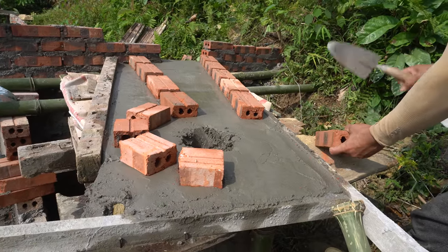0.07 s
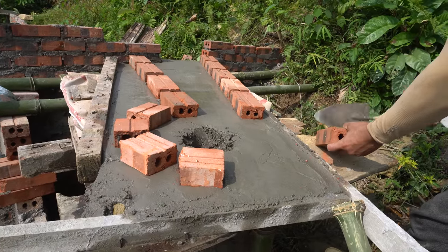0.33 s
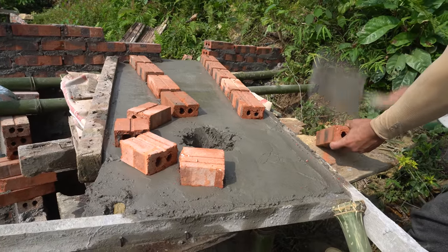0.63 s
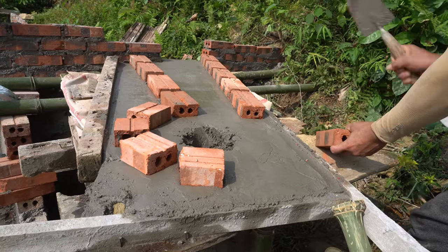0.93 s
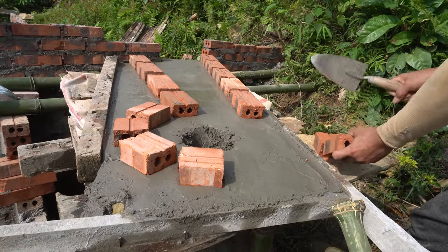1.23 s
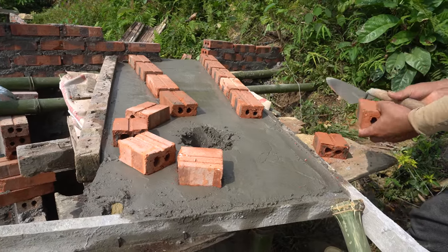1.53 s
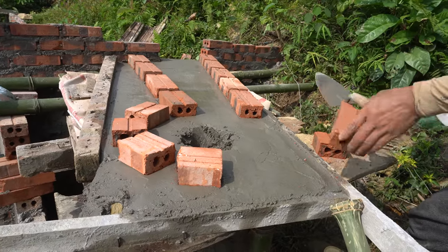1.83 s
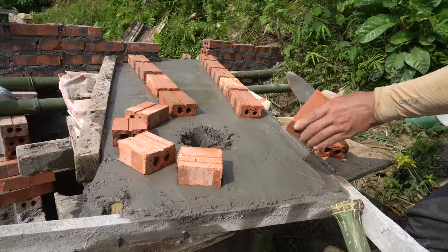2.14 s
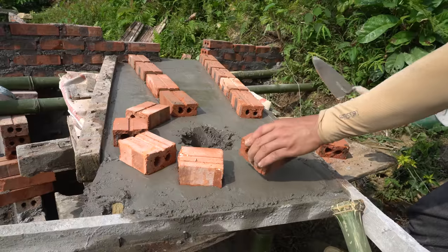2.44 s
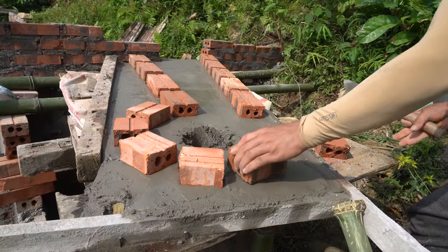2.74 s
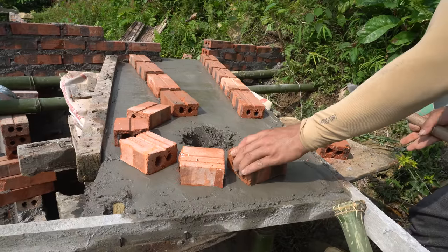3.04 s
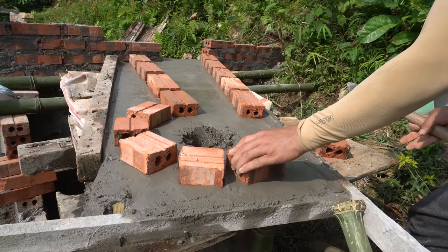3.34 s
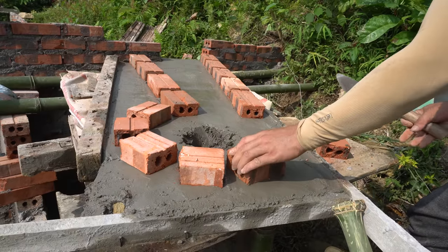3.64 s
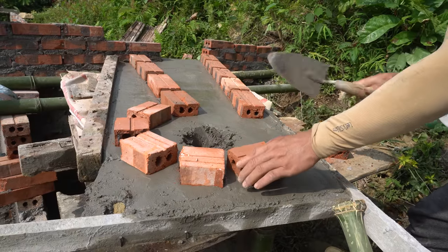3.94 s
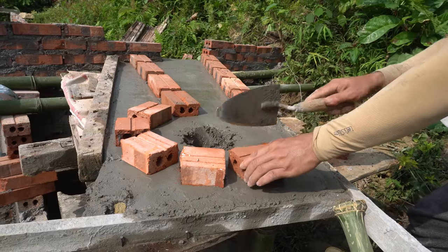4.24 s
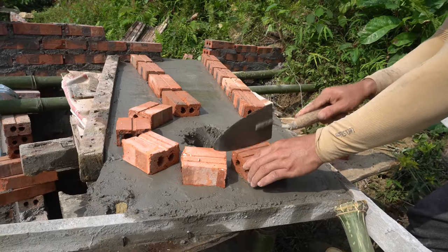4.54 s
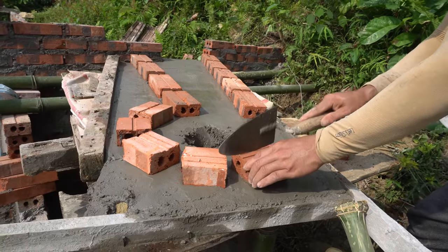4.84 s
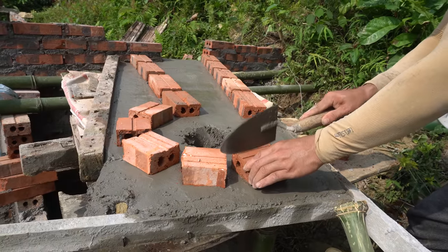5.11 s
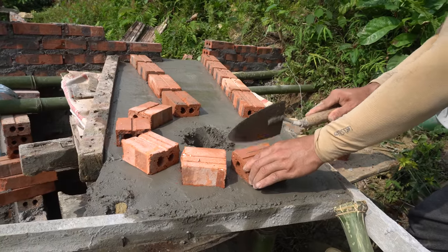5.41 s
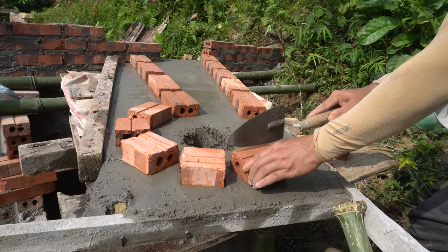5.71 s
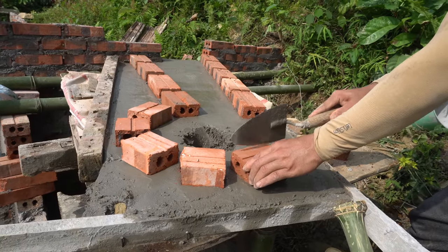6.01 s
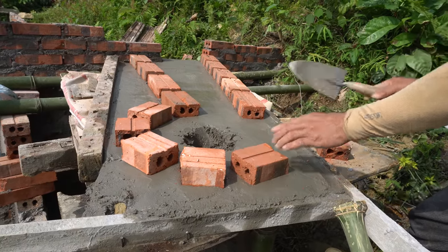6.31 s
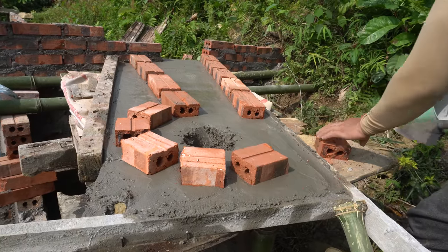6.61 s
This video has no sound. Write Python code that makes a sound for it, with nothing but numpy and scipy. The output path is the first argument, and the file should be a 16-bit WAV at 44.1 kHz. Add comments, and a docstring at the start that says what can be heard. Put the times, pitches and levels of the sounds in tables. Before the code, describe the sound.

Close, ringing cracks of a steel trowel cutting brick open the scene, four in a row, with crumbs scattering and an offcut knocking on a board. In the lull that follows, quiet running water comes through, a small bird chirps and a high insect hiss swells. Then the blade taps the brick down in a fast, even series of clinking knocks, at an outdoor building site.

```python
"""Four sharp chops ring out as a steel trowel cuts a hollow brick, and a piece drops onto a board.
The trowel then taps the brick down into wet mortar. Each impact is a broadband crack of clay
followed by the free vibration of blade and brick; a limiter flattens the attacks.
Nearby water runs and gurgles with resonating bubbles, an insect hisses and a small bird chirps."""
import sys
import numpy as np
from scipy import signal
from scipy.fft import rfft, irfft
from scipy.io import wavfile
from scipy.ndimage import uniform_filter1d

SR = 44100
rng = np.random.default_rng(int(sys.argv[2]) if len(sys.argv) > 2 else 0)


def dump(signal):
    """Clip the signal to [-1, 1] and save it as 16-bit WAV at the path in sys.argv[1]."""
    limited = np.clip(np.atleast_2d(signal).T, -1, 1)
    pcm = np.round(limited * 32767).astype(np.int16)
    wavfile.write(sys.argv[1], SR, pcm)


N = 302526
TIME = np.arange(N) / SR

# Trowel blows. Each row: start in seconds, crack level in dB, rebound delay in seconds, rebound in dB
# relative to the crack, contact place along the blade 0-1, ring gain in dB, hardness in dB per octave.
CHOP_BLOWS = [(0, -29.5, 0.024, 8, .36, -5, 5.5), (.3268, -14, 0.018, 4.5, .7, 9.5, -7.5),
              (.688, -13.5, .014, 11, .02, 3.5, 3.5), (1.0611, -12.5, 0.02, 0.5, .74, 7.5, 1)]
TAP_BLOWS = [(4.5239, -20.5, .0055, 3, .71, -5.5, 4.5), (4.7146, -19.5, .0054, 5.5, 0.15, -1.5, 4),
             (4.8843, -15, .015, 2, 0.89, 2, 2.5), (5.0346, -15.5, .014, -32, 0.96, 1.5, 3),
             (5.1681, -14.5, .0074, -19, .51, 7.3, 0.5), (5.2941, -21, .0037, -19, .21, 1.6, 3.5),
             (5.4077, -19.5, .008, -22, 0.74, 3.8, 3), (5.5502, -16.5, .014, -18, 0.932, 5.5, -0.5),
             (5.6943, -18, .0095, 0, .89, 0.5, 1), (5.858, -18, .018, 4, 0.068, -0.6, 5),
             (6.0042, -18, .009, 3.5, 0.085, -3.5, 5.5)]
# Normal modes. Each row: frequency in Hz, relative level in dB, T60 (time to fall 60 dB) in seconds.
BLADE_MODES = [(1448, -27.4, .55), (1479, -21.9, .52), (1553, -21, .28), (2123, -25.2, .3),
               (2379, -30.2, .8), (3118, -33.8, .28), (3382, -34.6, .33), (4185, -31.4, .23),
               (4397, -30, .22), (4617, -37.8, .33), (5551, -37.5, .27), (775, -33, .16), (915, -37, .31),
               (2196, -46, .5), (2677, -43, .16), (5080, -48, .22), (5320, -38, .18), (5912, -45, .16),
               (6460, -29.5, .14), (6625, -37, .15), (6976, -47, .16), (7288, -45, .17), (8576, -35, .14),
               (8850, -40, .08), (9215, -38, .13), (10402, -41, .14), (11761, -42, .07), (12377, -39, .07),
               (13213, -39, .07), (14461, -48, .06)]
BRICK_MODES = [(249, -27.5, 0.052), (709.5, -10, 0.036), (1247, -11, 0.031), (1401, -11.5, 0.067),
               (2080, -10, 0.011), (3310, -75, 0.012)]
# Standing waves of the first eleven blade modes. Each row: number of half waves, place of a node 0-1.
STANDING_WAVES = [(3.9, .22), (2.4, .1), (3.8, .13), (5.6, 0), (4.4, .04), (5.8, .05), (4.9, .1),
                  (5.6, .02), (3.2, .06), (6.0, .02), (1.5, .17)]
# Damping of the crack. Each row: frequency in Hz, T60 in seconds.
CRACK_DECAY = [(100, 0.18), (700, 0.12), (3000, 0.074), (8000, 0.084), (15000, 0.034)]
# Noise spectra. Each row: frequency in Hz, relative spectral density in dB.
CHOP_SPECTRUM = [(20, -64), (45, -2), (90, -6.5), (220, 6), (500, -1.5), (1000, 3.5), (1600, 5),
                 (3000, 3.5), (4200, -2), (5200, 0.5), (7000, -6.5), (10000, -2.5), (13500, -6.5),
                 (16000, -6.5)]
TAP_SPECTRUM = [(20, -59), (60, -11.5), (130, -14.5), (260, 4), (420, -5), (700, 2.5), (1000, 1),
                (1400, 1.5), (2500, 4), (3800, -3.5), (5200, -2.5), (7500, -7.5), (12000, -8), (16000, -15)]
GRIT_SPECTRUM = [(200, -6), (1000, -0.5), (3000, 10), (7000, -5), (12000, -6), (16000, -17)]
BOARD_SPECTRUM = [(30, -44), (70, -7), (140, -10), (240, 8), (380, -4.5), (520, -1.5), (650, 3),
                  (900, -8.5), (1300, -19), (5000, -63)]
WATER_SPECTRUM = [(15, -39), (25, -30), (58, -9.5), (161, -7.5), (200, 1), (503, -6), (641, -1.5),
                  (1130, -2.5), (1260, -3.5), (3340, -4), (5140, -8.5), (7510, -9), (8140, -7.5),
                  (9320, -10.5), (16000, -19)]
# Directions of the sources. Each row: frequency in Hz, left minus right level in dB.
CHOP_BALANCE = [(200, 1), (800, 2.5), (1450, -5.5), (2400, -6), (8000, -8.5), (15000, 1)]
TAP_BALANCE = [(200, 0), (700, -1), (1400, -3), (2400, -5), (4400, -3), (15000, 0)]
WATER_BALANCE = [(60, -4), (110, 2.5), (200, 1.5), (380, 1.5), (700, 3), (1290, 3.5), (2380, 5),
                 (4400, 4.0), (8120, 3), (15000, 0.5)]
# Likeness of the two channels. Each row: frequency in Hz, correlation 0-1.
CRACK_CORRELATION = [(200, 1), (800, 0.81), (2000, 0.8), (5000, 0.96), (15000, 0.56)]
WATER_CORRELATION = [(60, 0.94), (300, 0.8), (700, 0.79), (1400, 0.67), (3100, 0.23), (6800, 0.053),
                     (15000, 0.051)]
# The edge grates in the cut. Each row: start in seconds, level in dB, frequency in Hz, T60 in seconds.
EDGE_GRATES = [(0, -31, 2935, .7), (.027, -24, 2950, .06), (.327, -14, 3000, .04), (1.0615, -13, 5070, .07),
               (1.1, -44, 5070, .65)]
# Crumbs of clay and small handling ticks click. Each row: start in seconds, level in dB, frequency in Hz.
CRUMB_CLICKS = [(0.439, -32, 2920), (.755, -31, 2940), (0.797, -33, 3000), (1.13, -32, 3300),
                (1.189, -35.5, 3170), (1.35, -39.5, 9000), (1.596, -41.5, 1950), (2.557, -44, 11000),
                (3.1213, -36.5, 2680), (3.899, -42, 3700), (4.177, -36.5, 1600), (4.474, -35, 7000),
                (5.936, -39, 8000)]
# One shower of grit per chop. Each row: loudest moment in seconds, level in dB.
GRIT_SHOWERS = [(.035, -33.5), (.425, -32), (.775, -33.5), (1.165, -36.5)]
# The broken piece lands and rocks. Each row: start in seconds, level in dB.
LANDINGS = [(1.1457, -20.5), (1.151, -23.5), (1.174, -42)]
# Rumbles as the brick is handled. Each row: start in seconds, length in seconds, level in dB.
HANDLING_RUMBLES = [(0, 0.095, -43), (3.705, 0.55, -57)]
# Background level over time: the steady water ducks after the blows and slowly comes back as the
# gain control recovers. Each row: time in seconds, relative level in dB.
BACKGROUND_DUCKING = [(0.0, -49.5), (0.21, -49), (0.76, -53.5), (0.99, -53.5), (1.37, -56), (3.28, -52),
                      (3.82, -49.5), (4.87, -50), (5.29, -53), (6.02, -53.5), (6.29, -54.5), (6.86, -52)]
# Prominent bubbles. Each row: start in seconds, level in dB, frequency in Hz.
WATER_GURGLES = [(2.639, -44, 646), (3.408, -43, 1160), (3.457, -42, 1870), (3.587, -41.5, 730),
                 (3.799, -40, 634), (4.062, -39, 1104), (4.581, -37, 1120)]
# Bird calls. Each row: start and length in seconds, level in dB, first and last frequency in Hz.
BIRD_CHIRPS = [(2.872, 0.057, -49, 5720, 6730), (3.004, 0.085, -48, 6230, 5930),
               (5.075, .06, -53, 6370, 6800), (5.225, 0.068, -44, 5800, 6660),
               (6.741, 0.1, -45, 6620, 7100)]


def trowel(rows, spectrum, balance, impulse, scatter, crush, peak_db, upper_db, brick_db):
    """Impact excitation: the blade strikes, rebounds once and rings until the next blow damps it."""
    out = np.zeros((2, N))
    ends = [row[0] for row in rows[1:]] + [rows[-1][0] + 1]
    for (start, crack_db, delay, rebound_db, place, ring_db, hardness_db), end in zip(rows, ends):
        modes = struck_blade(place, ring_db, hardness_db, upper_db)
        steel = ring(modes, size=int((end - start) * SR) + 100)
        steel[:, -200:] *= np.linspace(1, 0, 200)
        add(out, start, steel)
        add(out, start, amp(crack_db) * crack(spectrum, peak_db, impulse, scatter, crush))
        add(out, start, amp(crack_db + brick_db) * ring(BRICK_MODES, size=SR // 4))
        rebound = crack(spectrum, peak_db, impulse=0, scatter=scatter / 2, crush=0)
        add(out, start + delay, amp(crack_db + rebound_db) * rebound)
    direction = pan(curve(balance, np.fft.rfftfreq(N, 1 / SR)))
    return irfft(rfft(out) * direction, N)


def struck_blade(place, ring_db, hardness_db, upper_db, node_db=-16.5, pivot_hz=1520, scatter_db=1.5):
    """Modal coupling: a mode responds strongly when struck at an antinode, faintly at a node."""
    modes = np.array(BLADE_MODES, float)
    half_waves, node = np.transpose(STANDING_WAVES)
    main, rest = modes[:len(node)], modes[len(node):]
    displacement = np.sin(np.pi * half_waves * (place - node))
    coupling_db = 10 * np.log10(displacement ** 2 + amp(node_db) ** 2)
    tilt_db = hardness_db * np.log2(main[:, 0] / pivot_hz)  # hard contact favours high modes
    main[:, 1] += ring_db + coupling_db + tilt_db
    rest[:, 1] += upper_db + scatter_db * rng.standard_normal(len(rest))
    return modes


def ring(modes, size, attack_s=0.00085):
    """Free vibration is a sum of damped sinusoids; higher ones differ more in phase between the ears."""
    hz, db, t60 = np.transpose(modes)[:, :, None]
    t = np.arange(size) / SR
    waves = amp(db - 60 * t / t60) * np.exp(2j * np.pi * hz * t)
    spread = np.minimum(hz.T / 5000, 1)
    phase = rng.uniform(0, 2 * np.pi, len(modes)) + spread * rng.standard_normal((2, len(modes)))
    return (np.exp(1j * phase) @ waves).imag * (1 - np.exp(-t / attack_s))


def crack(spectrum, peak_db, impulse, scatter, crush, crush_s=0.0038):
    """Source and filter: an impulse and the chatter of crushed clay excite the blade's high modes."""
    hz, t, noise = signal.stft(rng.standard_normal((3, SR // 2)), SR, nperseg=128)
    correlation = curve(CRACK_CORRELATION, hz)[:, None]
    chatter = np.sqrt(correlation) * noise[0] + np.sqrt(1 - correlation) * noise[1:]
    chatter *= amp(-60 * t / curve(CRACK_DECAY, hz)[:, None])
    burst = scatter * signal.istft(chatter, SR, nperseg=128)[1][:, :SR // 2]
    burst *= 1 + crush * np.exp(-TIME[:SR // 2] / crush_s)
    burst[:, 0] -= impulse
    high_modes = [hz for hz, _, _ in BLADE_MODES if hz > 3000]
    return colour(burst, spectrum, high_modes, peak_db)


def clay(grate_width_hz=250, crumb_relative_width=0.33, crumb_t60_cycles=140):
    """Friction and small impacts: the edge grates in the cut, and crumbs and handling ticks click."""
    out = np.zeros((2, N))
    for start, db, hz, t60 in EDGE_GRATES:
        add(out, start, amp(db) * rasp(hz, grate_width_hz, t60))
    for start, db, hz in CRUMB_CLICKS:
        add(out, start, amp(db) * rasp(hz, crumb_relative_width * hz, crumb_t60_cycles / hz))
    return pan(-7) * out


def rasp(hz, width_hz, t60, attack_s=0.00031):
    """A randomly driven resonance gives a rough tone, here dying away exponentially."""
    t = TIME[:SR // 2]
    noise = noise_band(len(t), hz, width_hz, correlation=0.97)
    return noise * amp(-60 * t / t60) * (1 - np.exp(-t / attack_s))


def grit(grains_per_s=1200, spread_db=1.5, rise_db_per_s=170, fall_db_per_s=115):
    """Shot noise: falling grains strike at random, in a shower that swells and fades at each chop."""
    hits = rng.random((2, N)) < grains_per_s / SR
    grains = hits * amp(spread_db * np.minimum(rng.exponential(1, (2, N)), 5))
    grains *= rng.choice([-1, 1], (2, N))
    envelope = sum(amp(db - np.maximum(rise_db_per_s * (peak - TIME), fall_db_per_s * (TIME - peak)))
                   for peak, db in GRIT_SHOWERS)
    crossfeed = 0.096 * grains[::-1]
    return envelope * unit_rms(colour(grains + crossfeed, GRIT_SPECTRUM))


def offcut(impulse=14, thud_t60=0.095):
    """The falling piece excites the low, heavily damped resonances of a board."""
    out, t = np.zeros((2, N)), TIME[:SR // 2]
    for start, db in LANDINGS:
        thud = stereo_noise(len(t), correlation=0.97) * amp(-60 * t / thud_t60)
        thud[:, 0] -= impulse  # the landing itself, before the board rattles
        add(out, start, amp(db) * colour(thud, BOARD_SPECTRUM))
    return pan(1) * out


def rumble():
    """Handling the brick gives short swells of low-frequency noise."""
    out = np.zeros((2, N))
    deep = noise_band(N, hz=60, width_hz=70, correlation=0.97)
    for start, length, db in HANDLING_RUMBLES:
        size = int(length * SR)
        add(out, start, amp(db) * np.hanning(size) * deep[:, int(start * SR):][:, :size])
    return out


def water(bubble_count=220, bubbles_db=-14, spray_db=-21, drops_per_s=60):
    """Running water is a superposition of broadband wash, small bubbles, spray and a few gurgles."""
    out = wash()
    for when, pitch, strength, side in rng.random((bubble_count, 4)):
        gain = amp(bubbles_db + 19.3 * strength ** 2) * pan(7 * side)
        add(out, when * N / SR, gain * bubble(hz=620 * 4.5 ** pitch))
    spray = (rng.random((2, N)) < drops_per_s / SR) * rng.standard_normal((2, N))
    out += amp(spray_db) * unit_rms(colour(spray, GRIT_SPECTRUM))
    out *= amp(7 + np.interp(TIME, *np.transpose(BACKGROUND_DUCKING)))
    for start, db, hz in WATER_GURGLES:
        add(out, start, amp(db) * pan(7.1) * bubble(hz))
    return out


def wash(patch_db=3, flicker_db=1.2):
    """Random amplitude modulation: the water's noise flickers as a whole and in patches of spectrum."""
    frames, hz = N // 256 + 5, np.fft.rfftfreq(1024, 1 / SR)
    noise = rng.standard_normal((5, frames, len(hz)))
    left, independent = noise[0] + 1j * noise[1], noise[2] + 1j * noise[3]
    patches = unit_rms(uniform_filter1d(uniform_filter1d(noise[4], size=7, axis=0), size=8, axis=1))
    flicker = unit_rms(uniform_filter1d(rng.standard_normal((frames, 1)), size=4, axis=0))
    correlation = curve(WATER_CORRELATION, hz)
    right = correlation * left + np.sqrt(1 - correlation ** 2) * independent
    level_db = curve(WATER_SPECTRUM, hz) + patch_db * patches / (1 + hz / 5000) + flicker_db * flicker
    spectra = np.array([left, right]) * amp(level_db) * pan(curve(WATER_BALANCE, hz))[:, None]
    return unit_rms(signal.istft(spectra.swapaxes(1, 2), nperseg=1024, noverlap=768)[1][:, :N])


def bubble(hz, decay_cycles=9):
    """A bubble is a damped oscillator: its tone swells and rings unevenly for a few cycles."""
    age = np.arange(int(4 * decay_cycles / hz * SR)) / SR * hz / decay_cycles  # in time constants
    wobble = 0.06 * np.cumsum(rng.standard_normal(len(age)))
    envelope = 2 * np.exp(-age) * (1 - np.exp(-4 * age))
    return envelope * np.sin(2 * np.pi * decay_cycles * age + wobble)


def insect(hiss_db=-52.5, full_at_s=3.62, swell_db_per_s=14.5):
    """Narrowband noise: a hiss around a thin whistle swells, then holds its level."""
    hiss = noise_band(N, hz=8200, width_hz=600, correlation=0.11)
    whistle = unit_rms(resonance(stereo_noise(N, correlation=0.2), hz=8250, width_hz=50))
    swell = amp(hiss_db - swell_db_per_s * np.maximum(full_at_s - TIME, 0))
    return swell * (hiss + amp(-6) * whistle)


def bird():
    """Frequency modulation: each chirp is a gliding tone whose phase wavers at random."""
    out = np.zeros((2, N))
    for start, length, db, first_hz, last_hz in BIRD_CHIRPS:
        size = int(length * SR)
        phase = 2 * np.pi * np.cumsum(np.linspace(first_hz, last_hz, size)) / SR
        waver = 0.19 * np.cumsum(rng.standard_normal((2, size)), axis=1)
        add(out, start, 2 * amp(db) * np.hanning(size) * np.sin(phase + waver))
    return out


def colour(x, spectrum, peaks_hz=(), peak_db=0, half_width_hz=75, size=4096):
    """A minimum-phase filter of unit power gain imposes a spectrum and optional resonance peaks."""
    hz = abs(np.fft.fftfreq(size, 1 / SR))
    bumps = np.zeros(size)
    for centre in peaks_hz:
        bumps = np.maximum(bumps, 1 / (1 + ((hz - centre) / half_width_hz) ** 2))
    bumps -= uniform_filter1d(bumps, size=160)
    log_gain = np.log(amp(curve(spectrum, hz) + peak_db * bumps))
    response = np.exp(np.conj(signal.hilbert(log_gain)))
    kernel = np.fft.ifft(response).real[:size // 2]
    return signal.oaconvolve(x, kernel[None] / np.linalg.norm(kernel), axes=1)[:, :x.shape[1]]


def stereo_noise(size, correlation):
    """The share of power common to two noise channels sets their correlation."""
    shared = rng.standard_normal(size)
    return np.sqrt(correlation) * shared + np.sqrt(1 - correlation) * rng.standard_normal((2, size))


def noise_band(size, hz, width_hz, correlation):
    """Two equal resonators in series confine noise to a band."""
    once = resonance(stereo_noise(size, correlation), hz, width_hz)
    return unit_rms(resonance(once, hz, width_hz))


def resonance(x, hz, width_hz):
    """A second-order resonator, whose Q is frequency over bandwidth."""
    return signal.lfilter(*signal.iirpeak(hz, hz / width_hz, SR), x)


def amp(db):
    """Amplitude grows tenfold every 20 dB."""
    return 10 ** (np.asarray(db) / 20)


def unit_rms(x):
    """Normalisation to unit mean power."""
    return x / np.sqrt(np.mean(x ** 2) + 1e-20)


def curve(points, hz):
    """Interpolation on a logarithmic frequency axis."""
    knots_hz, values = np.transpose(points)
    return np.interp(np.log(hz + 1), np.log(knots_hz + 1), values)


def pan(db):
    """A level difference between the ears, left minus right, gives direction."""
    return amp(np.array([[0.5], [-0.5]]) * db)


def add(mix, start, sound):
    """Superposition: a sound joins the mix at its start in seconds."""
    part = mix[:, round(start * SR):][:, :sound.shape[-1]]
    part += sound[..., :part.shape[1]]


def scene():
    """The pressures of chopping, tapping, debris and surroundings add linearly."""
    chops = trowel(CHOP_BLOWS, CHOP_SPECTRUM, CHOP_BALANCE,
                   impulse=4.5, scatter=0.63, crush=0.77, peak_db=2.5, upper_db=-13, brick_db=-13)
    taps = trowel(TAP_BLOWS, TAP_SPECTRUM, TAP_BALANCE,
                  impulse=9.3, scatter=0.74, crush=1.6, peak_db=11.5, upper_db=0, brick_db=13)
    return chops + taps + grit() + clay() + offcut() + rumble() + water() + insect() + bird()


def record(dry, threshold_db=-16, recovery_db_per_s=450, slope=0.7, cutoff_hz=16100):
    """Dynamic compression: a fast limiter holds the blows down, ahead of a low-pass filter."""
    power_db = 10 * np.log10(abs(uniform_filter1d((dry ** 2).mean(0), size=90)) + 1e-12)
    fall_db = TIME * recovery_db_per_s
    envelope_db = np.maximum.accumulate(power_db + fall_db) - fall_db
    excess_db = np.maximum(envelope_db - threshold_db, 0)
    limited = dry * amp(-slope * uniform_filter1d(excess_db, size=40))
    rounded = 0.9 * np.tanh(limited / 0.83)  # saturation rounds the sharpest peaks
    lowpass = signal.firwin(255, cutoff_hz, window=("kaiser", 8), fs=SR)
    return signal.oaconvolve(rounded, lowpass[None], "same")


dry = scene()
out = record(dry)
dump(out)
```